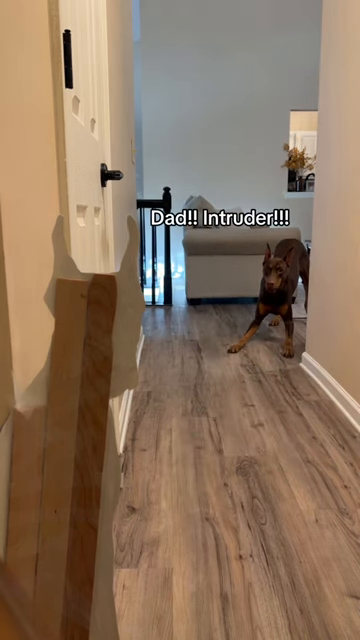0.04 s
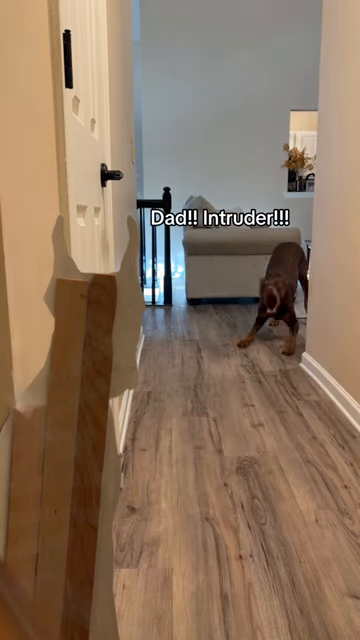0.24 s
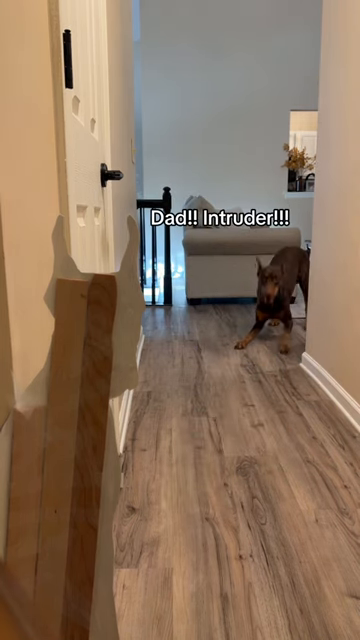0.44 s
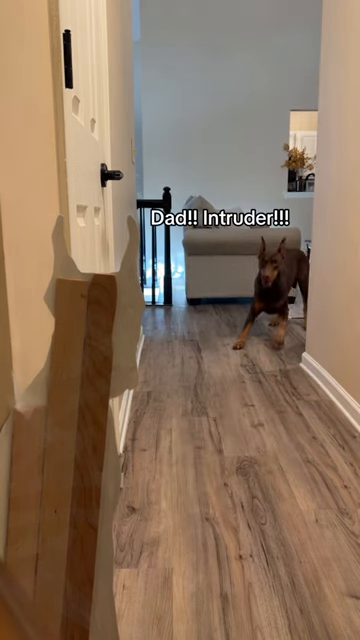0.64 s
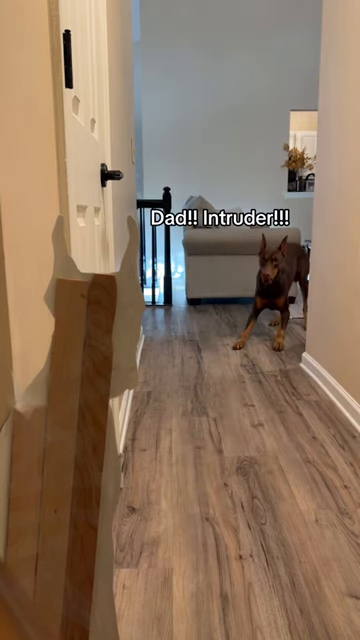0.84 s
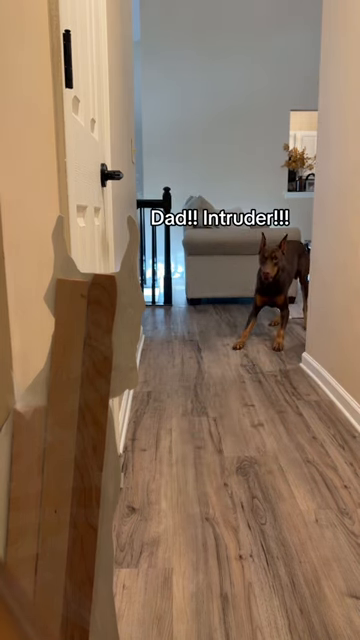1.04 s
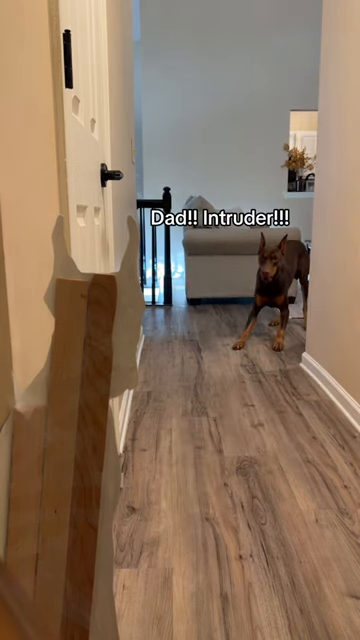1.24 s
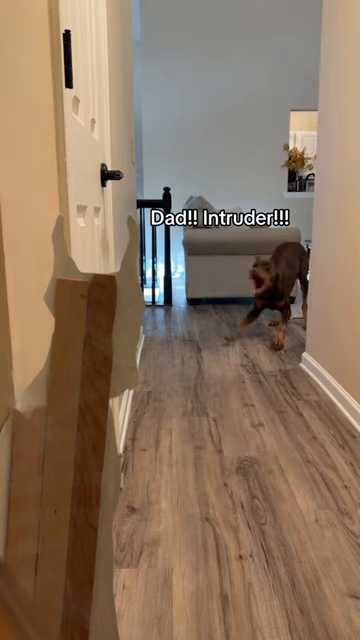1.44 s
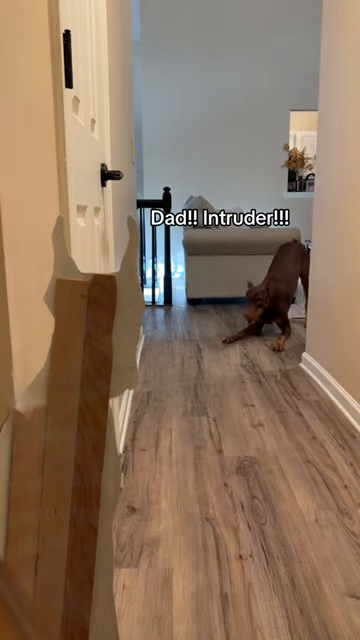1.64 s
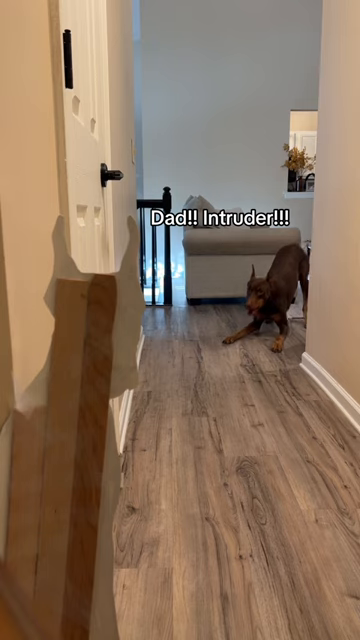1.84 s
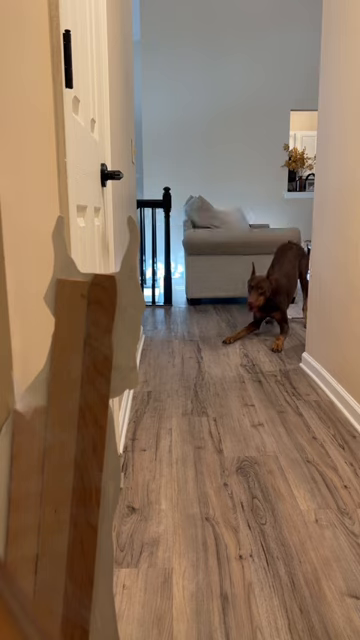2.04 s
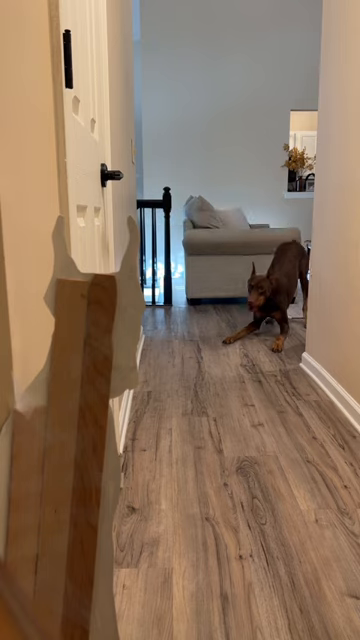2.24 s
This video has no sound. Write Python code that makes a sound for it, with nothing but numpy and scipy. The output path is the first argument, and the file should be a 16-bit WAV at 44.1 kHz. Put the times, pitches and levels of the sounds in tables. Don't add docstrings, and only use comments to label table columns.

```python
import sys
import numpy as np
from scipy import signal
from scipy.fft import rfft, irfft, next_fast_len
from scipy.io import wavfile
from scipy.ndimage import map_coordinates

SR = 44100
rng = np.random.default_rng(int(sys.argv[2]) if len(sys.argv) > 2 else 0)


def boost(x):
    u = np.asarray(x, float) / 20
    return 10 ** u


def master_out(mix):
    frames = np.transpose(np.atleast_2d(mix))
    ceiling = np.clip(frames, -1, 1)
    pcm = np.round(ceiling * 32767).astype(np.int16)
    wavfile.write(sys.argv[1], SR, pcm)


N = 101430


def unit(x):
    return x / np.sqrt(np.mean(x ** 2) + 1e-20)


def along(points, hz):
    point_hz, value = np.transpose(points)
    return np.interp(np.log(hz + 1), np.log(point_hz + 1), value)


def wobble(rate_hz, size):
    knots = rng.standard_normal(size // 20 + 4)
    return map_coordinates(knots, [np.arange(size) * rate_hz / SR])


def filtered(x, response):
    size = next_fast_len(len(x) + SR // 2)
    spectrum = rfft(x, size) * response(np.fft.rfftfreq(size, 1 / SR))
    return irfft(spectrum, size)[:len(x)]


def coloured(x, spectrum):
    return unit(filtered(x, lambda hz: boost(along(spectrum, hz))))


def resonances(peaks, f):
    return sum(boost(db) * (f * w) ** 2 / ((c * c - f * f) ** 2 + (f * w) ** 2) for c, w, db in peaks)


def house():
    # hz, width_hz, level_db
    hums = [(68, 12, -79), (150, 20, -85.5), (214.5, 4.2, -84), (400, 19, -83.5), (665.4, 10, -84.5),
            (735, 18, -82.5)]
    # hz, db_per_hz
    air_colour = [(12, -23), (20, -6), (220, -9), (543, -16), (684, -3.5), (779, -9.5), (1920, -14),
                  (6620, -28.5), (9500, -46), (12400, -71.5), (20900, -120)]
    hum = 0
    for hz, width_hz, level_db in hums:
        noise = rng.standard_normal(N)
        hum = hum + boost(level_db) * unit(filtered(noise, lambda f: resonances([(hz, width_hz, 0)], f)))
    air_db = -71.5 + wobble(8, N) / 2
    return boost(air_db) * coloured(rng.standard_normal(N), air_colour) + hum


def scrape(strokes, spectrum):
    grains_per_s, rise_s, fade_t60_s = 900, 0.013, 0.19
    t = np.arange(N) / SR
    grains = rng.standard_normal(N) * (1 + 1.4 * (rng.random(N) < grains_per_s / SR))
    envelope = np.zeros(N)
    for start_s, length_s, level_db in strokes:
        rise = np.clip((t - start_s) / rise_s + 1, 0, 1)
        fade = boost(-60 * np.clip(t - start_s - length_s, 0, 9) / fade_t60_s)
        envelope += boost(level_db) * rise * fade
    uneven = boost(1.5 * wobble(50, N))
    return envelope * uneven * coloured(grains, spectrum)


def paws():
    # start_s, length_s, level_db
    slide = [
        (0, 0.22, -53),
    ]
    # hz, db_per_hz
    slide_colour = [(24, -30.5), (40, -2.5), (203, -5), (343, -16.5), (415, -10.5), (668, -5.5),
                    (790, -11.5), (4400, -24), (12000, -50), (15600, -80.5), (22000, -120)]
    # start_s, length_s, level_db
    skids = [
        (.12, 0.15, -63.5),
        (.45, 0.064, -66),
        (0.599, 0.011, -62),
        (0.681, 0.021, -69.5),
        (1.036, 0.014, -84),
        (1.113, 0.0088, -82),
        (1.72, 0.035, -84),
    ]
    # hz, db_per_hz
    claw_colour = [(200, -6.5), (800, -5.5), (3000, 4.5), (7500, -4.5), (10000, -20.5), (14000, -52.5)]
    # start_s, peak_db, pitch_hz
    thumps = [
        (0.203, -35, 158),
        (0.258, -46, 85),
        (0.683, -50, 150),
        (.86, -67, 150),
        (1.03, -67, 305),
        (1.114, -66, 297),
        (1.36, -48.5, 119.5),
        (1.489, -42, 72.3),
    ]
    # hz, db_per_hz
    pad_colour = [(40, -31), (100, -4.5), (250, 0.5), (500, -8.5), (1200, -24), (4000, -60.5)]
    thump_t60_s, rise_s = 0.22, 0.0038
    t = np.arange(N) / SR
    out = scrape(skids, claw_colour) + scrape(slide, slide_colour)
    for start_s, peak_db, pitch_hz in thumps:
        since_s = np.clip(t - start_s, 0, 9)
        envelope = boost(peak_db - 60 * since_s / thump_t60_s) * (1 - np.exp(-since_s / rise_s))
        puff = coloured(rng.standard_normal(N), pad_colour)
        out += envelope * (np.sin(2 * np.pi * pitch_hz * since_s) + 0.5 * puff)
    return out


def bark(rows, jaws_open):
    # hz, width_hz, level_db
    jaws_shut = [(495, 150, 7), (877.6, 73, 1.5), (1590, 320, -8), (2020, 330, -37)]
    # hz, width_hz, level_db
    teeth = [(2730, 500, 2.5), (3300, 470, -2), (4320, 500, 3.5), (5330, 880, 0), (6190, 900, -2.5),
             (7660, 1400, -6.5), (12630, 3400, -34), (15000, 1800, -27)]
    pitch_scatter, half_pulse, rasp_db = 0.037, 0.25, 9.5
    air_db, air_opens_db = -25, 4.5
    knot_s, *columns = np.transpose(rows)
    t = np.arange(knot_s[0], knot_s[-1], 1 / SR)
    pitch_hz, level_db, rough, opening = [np.interp(t, knot_s, column) for column in columns]
    rough, opening = np.clip(rough, 0, 1), np.clip(opening, 0, 1)
    pitch_hz = pitch_hz * (1 + pitch_scatter * rough * wobble(150, len(t)))
    phase = 2 * np.pi * np.cumsum(pitch_hz) / SR

    k = np.arange(1, 33)[:, None] / 2
    shut_gain = resonances(jaws_shut, k * pitch_hz)
    open_gain = resonances(jaws_open, k * pitch_hz)
    gain = (1 - opening) * shut_gain + opening * open_gain
    strength = np.where(k % 1, half_pulse * rough, 1)
    folds = (strength * gain * np.cos(k * phase + k ** 2)).sum(0)

    breath, rush = rng.standard_normal((2, len(t))) * (1 + 0.46 * np.cos(phase))
    rasp_shut = filtered(breath, lambda f: resonances(jaws_shut, f))
    rasp_open = filtered(breath, lambda f: resonances(jaws_open, f))
    rasp = (1 - opening) * rasp_shut + opening * rasp_open
    air = boost(air_db + air_opens_db * opening) * unit(filtered(rush, lambda f: resonances(teeth, f)))
    return knot_s[0], boost(level_db) * (unit(folds) + boost(rasp_db) * rough * unit(rasp) + air)


def hall(x):
    # hz, t60_s
    decay = [(150, 0.98), (350, 0.43), (750, 0.63), (1500, 0.53), (4000, 0.54), (10000, 0.76)]
    # hz, level_db
    far_colour = [(150, -5.5), (400, -4.5), (750, 0), (1500, 2), (4000, 0.5), (10000, -3)]
    # hz, level_db, t60_s
    flutter = [(739, -23, .7), (1123.5, -31.5, 0.82), (1469.2, -19, 0.79), (1474, -15, 0.76),
               (1487, -22, 1.1)]
    near_t60_s, near_db = 0.09, -6
    far_db, far_delay_s, far_build_s = -12, 0.038, 0.039
    end_wall_s, end_wall_db = 0.14, -26
    t = np.arange(SR) / SR
    near = rng.standard_normal(SR) * boost(-60 * t / near_t60_s) * (t > 0.003)
    near = near / np.linalg.norm(near)

    bin_hz, frame_s, bins = signal.stft(rng.standard_normal(SR), SR, nperseg=256)
    far_level_db = along(far_colour, bin_hz)[:, None] - 60 * frame_s / along(decay, bin_hz)[:, None]
    far = signal.istft(bins * boost(far_level_db), SR, nperseg=256)[1][:SR]
    far = far * np.clip((t - far_delay_s) / far_build_s, 0, 1)

    echo = boost(near_db) * near + boost(far_db) * far / np.linalg.norm(far)
    for hz, level_db, t60_s in flutter:
        echo = echo + boost(level_db - 45 - 60 * t / t60_s) * np.sin(2 * np.pi * hz * t)
    echo = echo + boost(end_wall_db) * np.roll(near, round(end_wall_s * SR))
    return np.pad(x, (0, SR - 1)) + signal.fftconvolve(x, echo)


def dog():
    # time_s, pitch_hz, level_db, roughness [0-1], mouth_opening [0-1]
    barks = [
        [(.176, 192.6, -39.5, 0.1, 0.2), (.2, 193.5, -21.5, 0.4, 0), (.214, 241.4, -22, 0.5, 0.2),
         (.232, 242.6, -25.5, 0.6, .4), (.245, 357.8, -17.5, 0.4, 0.5), (.262, 363.5, -18.5, 0.2, 0.88),
         (.3, 379.7, -19, 0.1, 0.8), (.34, 369.3, -27.5, 0.2, 1), (.375, 350, -67.5, 0.3, 0.4)],
        [(1.358, 198.6, -65, 0.4, 0), (1.385, 207.1, -33, 0.42, 0), (1.405, 215.8, -23, 0.37, .15),
         (1.422, 245.6, -19, 0.24, 0.05), (1.44, 350.6, -22, .4, 0.1), (1.458, 356.1, -19.5, 0.13, 0.94),
         (1.495, 370, -25, 0.2, 0.83), (1.522, 351, -29, 0.2, 0.9), (1.57, 277.2, -52, .3, 0.11)],
    ]
    # hz, width_hz, level_db
    open_throats = [
        [(370, 120, -3.5), (500, 50, -3.5), (765, 160, 7), (1120, 250, 5.5), (1500, 210, -3.5),
         (1850, 140, -15), (2800, 690, -44), (4400, 390, -33.5)],
        [(370, 160, -9), (547, 50, 3), (744, 160, 2.5), (1110, 210, -1), (1370, 210, 1), (1800, 300, -18.5),
         (2680, 600, -29.5), (4160, 860, -29)],
    ]
    out = np.zeros(N + 2 * SR)
    for rows, jaws_open in zip(barks, open_throats):
        start_s, voice = bark(rows, jaws_open)
        wet = hall(voice)
        out[round(start_s * SR):][:len(wet)] += wet
    return out[:N]


def scene():
    return (dog() + paws() + house())[None]


def roll_off(x):
    return signal.sosfilt(signal.butter(12, 15760, fs=SR, output="sos"), x)


def record(dry):
    return roll_off(dry)


dry = scene()
out = record(dry)
master_out(out)
```